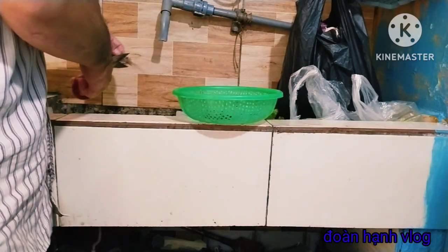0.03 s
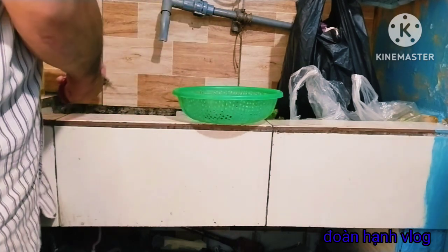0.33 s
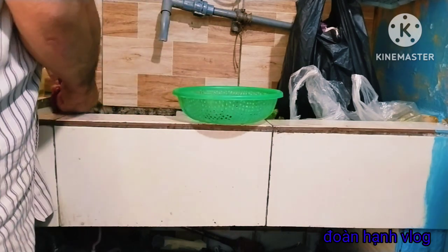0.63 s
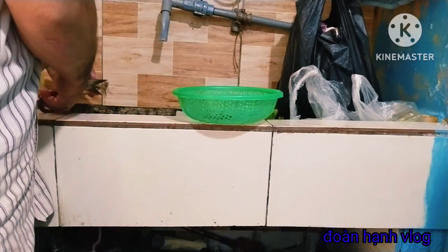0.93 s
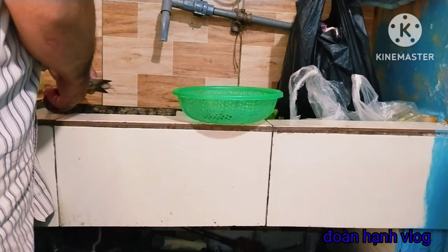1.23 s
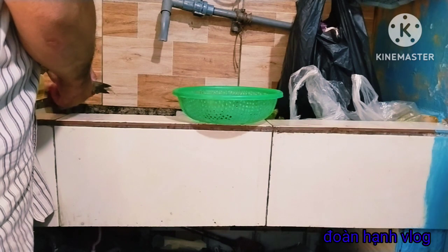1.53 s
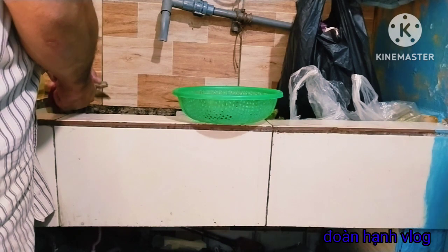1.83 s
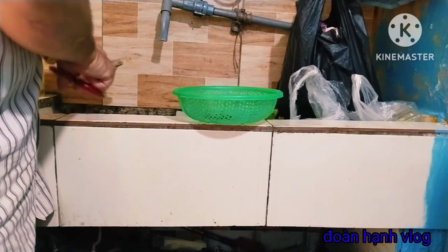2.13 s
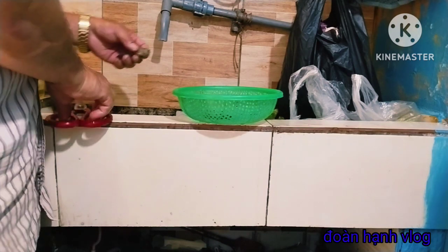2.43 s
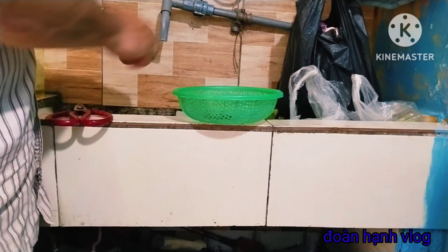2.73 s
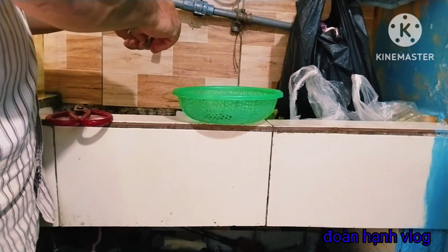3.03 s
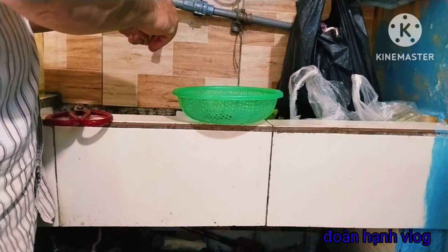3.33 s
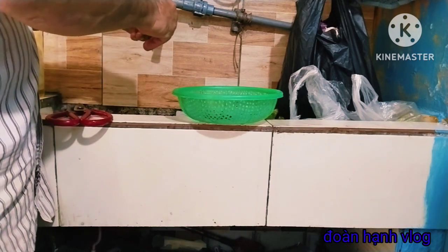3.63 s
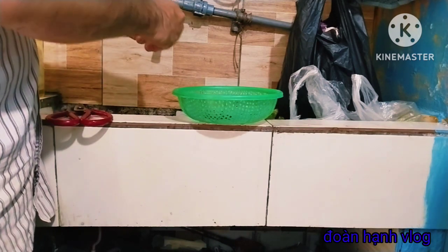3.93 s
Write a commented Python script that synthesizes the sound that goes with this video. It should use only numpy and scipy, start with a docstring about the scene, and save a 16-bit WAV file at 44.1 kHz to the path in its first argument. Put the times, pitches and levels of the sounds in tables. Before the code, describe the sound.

Kitchen scissors snip shrimp shell twice, then clink and rattle to rest on a tiled counter close by. Faint raps, scrapes and a hollow thump come from farther off in a hard-walled kitchen with a low hum.

```python
"""Kitchen scissors and shrimp shell

Scissors shear through shell by friction and fracture, then clink and rock to rest on a tiled counter,
each impact exciting the modes of the blades. Farther off, something is rapped and scraped, a dish
rings and a hollow thump sounds. Hard walls reflect the sound, over a low hum and a quiet hiss."""
import sys
import numpy as np
from scipy import signal
from scipy.fft import rfft, irfft
from scipy.io import wavfile
from scipy.ndimage import uniform_filter1d, map_coordinates

SR = 44100
rng = np.random.default_rng(int(sys.argv[2]) if len(sys.argv) > 2 else 0)


def inscribe(sig):
    """Save sig as 16-bit PCM at rate SR to the path in sys.argv[1].

    A 1-D sig is mono; a 2-D sig holds one channel per row.
    Samples are clipped to [-1, 1] before scaling.
    """
    pcm = np.round(np.clip(np.atleast_2d(sig).T, -1, 1) * 32767)
    wavfile.write(sys.argv[1], SR, pcm.astype(np.int16))


N = 176400

# Levels are relative within each table.
# room reverberation (frequency [Hz], T60 [s])
ROOM_DECAY = [(150, 1), (400, 0.71), (1000, 0.54), (2800, 0.46), (9000, 0.47)]
# motor tones (frequency [Hz], level [dB])
HUM_TONES = [(39.1, -45.5), (131.3, -52.5)]
# noise spectra (frequency [Hz], level [dB])
HISS_SPECTRUM = [(25, -2), (51, -4), (86, -7), (139, -5.5), (500, -13), (1000, -17.5), (4230, -29),
                 (6180, -35), (9250, -28.5), (10500, -39.5), (13600, -55)]
SCRAPE_SPECTRUM = [(150, -4), (400, -4), (750, -2), (1200, -1), (1850, 3), (2500, -0.5), (3150, -4.5),
                   (3600, -6.5), (4200, -3.5), (5500, -11.5), (7700, -12.5), (9100, -5.5), (10500, -22)]
SLAP_SPECTRUM = [(160, -16.5), (280, -3), (520, -8), (800, -5.5), (1300, -11), (8000, -37)]
KNOCK_SPECTRUM = [(60, -32.5), (140, -14.5), (190, -8.5), (255, -7), (350, -12.5), (480, -19.5),
                  (800, -12.5), (1300, -30.5), (5000, -44)]
CLINK_SPECTRUM = [(500, -41), (4300, -10.5), (5500, 0), (6400, -2), (7700, 0.5), (8600, 7.5), (10000, 7.5),
                  (10700, -6.5)]
CLACK_SPECTRUM = [(200, 0), (850, -9.5), (1300, 1.5), (1850, 7.5), (2600, 0.5), (3400, 3.5), (4500, -9.5),
                  (9000, -3)]
SHEAR_SPECTRUM = [(2000, -10), (3800, -8.5), (5200, -2), (7000, 0.5), (8000, 0), (9200, 8), (10500, -6.5)]
CRACK_SPECTRUM = [(400, -23), (750, -6), (1300, -10), (2110, 0.5), (4300, 3.5), (5600, -2), (7130, 4),
                  (10500, -7)]
# modes with a common decay (frequency [Hz], level [dB])
RAPPED_MODES = [(1650, 3), (1900, 0.5), (2790, -3.5), (3170, 2.5), (4200, -6.5)]
BLADE_MODES = [(5500, -2.5), (5965, -12), (7140, 5), (8320, 10), (8585, 2), (8650, -1), (9635, -10)]
# modes with separate decays (frequency [Hz], level [dB], T60 [s])
DISH_MODES = [(910, -0.5, 0.14), (2214, -7.5, 0.17), (2830, -5, 0.14), (3770, 2, 0.036)]
HOLLOW_MODES = [(263.2, -2, 0.28), (299.3, -2, 0.25), (369, -1, 0.19)]
# distant raps (time [s], level [dB])
RAP_HITS = [(0.089, -30.5), (0.853, -30.5), (2.243, -34), (3.105, -33), (3.161, -35.5), (3.214, -40.5),
            (3.318, -33), (3.925, -30.5)]
# scraping strokes (time [s], level [dB], length [s], dish resonance [dB])
SCRAPE_STROKES = [(0.412, -36.5, 0.033, -3.5), (0.978, -30, 0.023, -29), (1.05, -33.5, 0.031, 4),
                  (1.166, -37.5, 0.029, 7), (1.205, -25.5, 0.019, -1.5), (1.604, -34, 0.014, 7.5),
                  (1.659, -38.5, 0.024, -13), (2.331, -44, 0.011, 6.5), (3.183, -36.5, 0.047, 6.5),
                  (3.298, -31.5, 0.035, 0), (3.411, -35.5, 0.031, -23), (3.956, -36, .03, -21)]
# hollow thumps (time [s], level [dB], slap [dB])
THUMP_HITS = [(1.209, -27, 5), (1.228, -23.5, -0.5), (1.259, -31.5, 2), (1.292, -30, 2.5)]
# hand and handles on the counter (time [s], level [dB], pitch [ratio])
COUNTER_HITS = [(2.09, -27.5, 0.37), (2.149, -35, 0.4), (2.452, -18.5, 1), (2.509, -27.5, 0.82),
                (2.68, -31, 0.92)]
# steel meeting tile (time [s], level [dB], handle clack [dB])
TILE_HITS = [(2.447, -8.5, 0), (2.454, -23, 7), (2.505, -20.5, -28), (2.565, -28, -5), (2.668, -16.5, -26),
             (2.782, -23.5, -27), (2.882, -33.5, -26), (2.894, -39, -20), (2.952, -43.5, -23)]
# blades sliding shut (time [s], level [dB], length [s])
BLADE_STROKES = [(0.396, -39, 0.015), (0.439, -37.5, 0.011), (0.474, -28, 0.02), (0.568, -27, 0.0262),
                 (1.816, -43, 0.012), (1.837, -32.5, 0.027), (1.956, -37, 0.0057)]
# shell giving way (time [s], level [dB], length [s], tilt above 2 kHz [dB/octave])
SHELL_CRACKS = [(0.589, -9, 0.0047, -4), (1.84, -34, 0.002, 13), (1.855, -18.5, 0.002, -16.5),
                (1.98, -30, 0.006, 2.5), (2.082, -21, 0.002, -12)]

SIZE = 32768  # samples per event
T = np.arange(SIZE) / SR
HZ = np.fft.rfftfreq(SIZE, 1 / SR)


def amp(db):
    """Amplitude grows tenfold every 20 dB."""
    return 10 ** (np.asarray(db) / 20)


def unit(x):
    """Normalisation to unit RMS."""
    return x / np.sqrt(np.mean(x ** 2) + 1e-20)


def along(points, hz):
    """Interpolation on a logarithmic frequency axis."""
    freqs, values = np.transpose(points)
    return np.interp(np.log(hz + 1), np.log(freqs + 1), values)


def add(track, s, x):
    """Superposition of x on the track at s seconds."""
    part = track[max(0, round(s * SR)):][:len(x)]
    part += x[:len(part)]


def coloured(x, db):
    """Minimum-phase filtering shapes the spectrum; energy is conserved."""
    cepstrum = irfft(np.log(unit(amp(db)) + 1e-6))
    cepstrum[1:SIZE // 2] *= 2
    cepstrum[SIZE // 2 + 1:] = 0
    y = irfft(rfft(x) * np.exp(rfft(cepstrum)))
    return y * np.linalg.norm(x) / np.linalg.norm(y)


def burst(length, attack, release, rough):
    """Tiny slips and fractures sum to grainy noise that rises, holds and decays."""
    grain = np.exp(rough * unit(uniform_filter1d(rng.standard_normal(SIZE), size=30)))
    shape = (1 - np.exp(-T / attack)) * amp(-60 * np.maximum(T - length, 0) / release)
    z = rfft(shape * grain * rng.standard_normal(SIZE))
    x = irfft(z / np.sqrt(np.abs(z) + 1e-12)) * np.sqrt(shape)  # flatter spectrum, steeper decay
    return x * np.linalg.norm(shape) / np.linalg.norm(x)


def ring(modes):
    """Free vibration is a sum of damped modes, here with slightly wandering phase."""
    out = np.zeros(SIZE)
    for hz, db, t60 in modes:
        decay = amp(db + rng.normal(0, 1) - 60 * T / t60)
        phase = rng.uniform(0, 2 * np.pi) + .065 * np.cumsum(rng.standard_normal(SIZE))
        out += decay * np.sin(2 * np.pi * hz * T + phase)
    return out


def room(x, early_db, late_db):
    """Reflection from counter and walls adds early echoes and a diffuse tail."""
    hz, t, z = signal.stft(rng.standard_normal(SIZE), SR, nperseg=256)
    z *= amp(-60 * t / along(ROOM_DECAY, hz)[:, None])
    tail = signal.istft(z, SR, nperseg=256)[1][:SIZE] * (1 - np.exp(-T / 0.0019))
    echoes = rng.standard_normal(SIZE) * (rng.random(SIZE) < .03)
    early = echoes * amp(-60 * T / 0.098) * (1 - np.exp(-T / 0.00096))
    response = amp(early_db) * early / np.linalg.norm(early) + amp(late_db) * tail / np.linalg.norm(tail)
    return x + signal.fftconvolve(x, response)[:SIZE]


def background(hiss_db=-45):
    """Steady broadband noise underlies a motor hum modulated slowly in level and phase."""
    t = np.arange(N) / SR
    spectrum = amp(along(HISS_SPECTRUM, np.fft.rfftfreq(N, 1 / SR)))
    hiss = unit(irfft(rfft(rng.standard_normal(N)) * spectrum, N))
    drift = lambda: map_coordinates(rng.standard_normal(40), [t * 4])
    hum = sum(amp(db + drift()) * unit(np.sin(2 * np.pi * hz * t + 0.94 * drift()))
              for hz, db in HUM_TONES)
    return amp(hiss_db) * hiss + hum


def raps(t60=0.027, scatter=0.079):
    """Hard impacts excite grit and heavily damped modes whose pitches vary from blow to blow."""
    out = np.zeros(N)
    for s, db in RAP_HITS:
        modes = [(hz * np.exp(scatter * rng.standard_normal()), level, t60) for hz, level in RAPPED_MODES]
        body = ring(modes) * (1 - np.exp(-T / 0.0012))
        grit = coloured(burst(.008, attack=0.002, release=0.054, rough=1.0), along(SCRAPE_SPECTRUM, HZ))
        body = room(body, early_db=4, late_db=1)
        grit = room(grit, early_db=-2.5, late_db=5.5)
        add(out, s, amp(db) * (body + amp(-2.5) * grit))
    return out


def scraping(dish_hz=940, half_width_hz=100):
    """Friction drives a resonance of the dish; longer strokes swell more gently."""
    out = np.zeros(N)
    resonance = -20 * np.log10(1 + ((HZ - dish_hz) / half_width_hz) ** 2)
    grit = along(SCRAPE_SPECTRUM, HZ)
    bite = 1 + .7 * np.exp(-T / .007)  # emphasis at first contact
    for s, db, length, dish_db in SCRAPE_STROKES:
        slips = burst(length, attack=3 * length ** 2, release=0.065, rough=0.84) * bite
        stroke = coloured(slips, grit) + amp(dish_db - 8) * coloured(slips, resonance)
        add(out, s, amp(db - 5) * room(stroke, early_db=-1.5, late_db=5.5))
    return out


def dish_tap():
    """One tap sets the dish vibrating at its natural frequencies."""
    out = np.zeros(N)
    tick = coloured(burst(0.003, attack=0.0013, release=0.082, rough=0.37), along(SCRAPE_SPECTRUM, HZ))
    add(out, 0.0008, amp(-27) * room(ring(DISH_MODES) + amp(-10) * tick, early_db=-14, late_db=-11))
    return out


def thumps():
    """A slap excites the low modes of a hollow resonator."""
    out = np.zeros(N)
    for s, db, slap_db in THUMP_HITS:
        slap = coloured(burst(0.0014, attack=0.0012, release=0.027, rough=0.32), along(SLAP_SPECTRUM, HZ))
        boom = ring(HOLLOW_MODES) * (1 - np.exp(-T / 0.0022))
        add(out, s, amp(db + 0.5) * (boom + amp(slap_db) * room(slap, early_db=2.5, late_db=1.5)))
    return out


def counter_knocks(base_hz=235, t60=0.042):
    """Strong damping limits the struck counter to a brief note and a dull shudder."""
    out = np.zeros(N)
    for s, db, pitch in COUNTER_HITS:
        note = np.sin(2 * np.pi * base_hz * pitch * T) * amp(2 - 60 * T / t60)
        contact = burst(0.0038, attack=0.0011, release=0.058, rough=0.19)
        shudder = coloured(contact, along(KNOCK_SPECTRUM, HZ / pitch))
        add(out, s, amp(db - 7) * (note + room(shudder, early_db=-22, late_db=3)))
    return out


def scissors_on_tile(blade_t60=.2, soft_db=-12.5):
    """Impacts rattle and ring the loose blades; softer contacts excite less treble."""
    out = np.zeros(N)
    lowest_hz, highest_hz = BLADE_MODES[0][0], BLADE_MODES[-1][0]
    clack = coloured(signal.unit_impulse(SIZE), along(CLACK_SPECTRUM, HZ))
    for s, db, clack_db in TILE_HITS:
        slope = 0.54 * min(db - soft_db, 0)  # dB per octave
        tilt = lambda hz: slope * np.log2(np.maximum(hz, lowest_hz) / highest_hz)
        contact = burst(0.0023, attack=0.00022, release=0.04, rough=0.28)
        rattle = coloured(contact, along(CLINK_SPECTRUM, HZ) + tilt(HZ))
        blades = amp(-15.5) * ring([(hz, level + tilt(hz), blade_t60) for hz, level in BLADE_MODES])
        impact = room(rattle + amp(clack_db + 17.5) * clack, early_db=0.5, late_db=-1)
        add(out, s, amp(db - 6) * (impact + blades))
    return out


def cutting():
    """Sliding friction makes the blades hiss; brittle fracture makes the shell crack."""
    out = np.zeros(N)
    for s, db, length in BLADE_STROKES:
        slips = burst(length, attack=0.00093, release=0.011, rough=0.34)
        hiss = coloured(slips, along(SHEAR_SPECTRUM, HZ))
        add(out, s, amp(db - 1) * room(hiss, early_db=-2.5, late_db=-1.5))
    for s, db, length, tilt in SHELL_CRACKS:
        spectrum = along(CRACK_SPECTRUM, HZ) + tilt * np.log2(np.maximum(HZ, 2000))
        crack = coloured(burst(length, attack=0.0024, release=0.019, rough=0.6), spectrum)
        add(out, s, amp(db - 7) * room(crack, early_db=0, late_db=-1))
    return out


def scene():
    """Sound pressures add linearly at one listening point."""
    return (cutting() + scraping() + dish_tap() + raps() + thumps() + counter_knocks()
            + scissors_on_tile() + background())[None]


def record(dry, low_hz=34, high_hz=10650, trace_hz=12800, top_hz=15700):
    """Band-pass filtering removes deep bass and high treble, leaving a faint band above the cut."""
    hz = np.fft.rfftfreq(2 * N, 1 / SR)
    band = 1 / np.sqrt(1 + (hz / high_hz) ** 160) / np.sqrt(1 + (low_hz / (hz + 1)) ** 16)
    trace = amp(-25) * (hz > trace_hz)
    return irfft(rfft(dry, 2 * N) * (band + trace) * (hz < top_hz))[:, :N]


dry = scene()
out = record(dry)
inscribe(out)
```